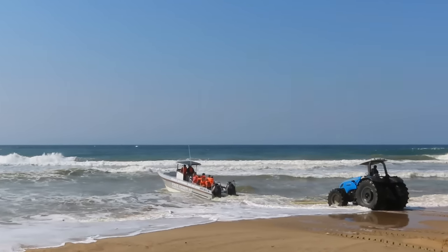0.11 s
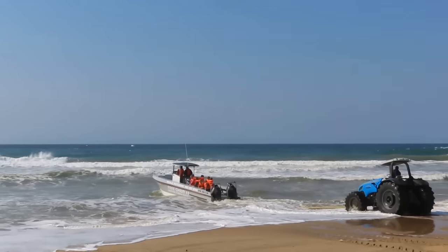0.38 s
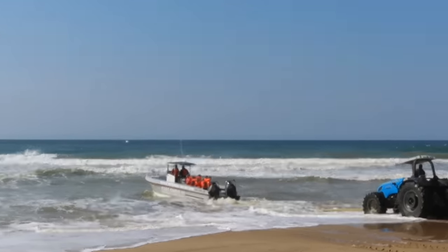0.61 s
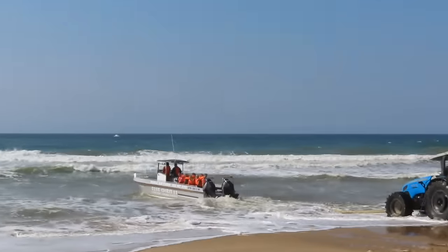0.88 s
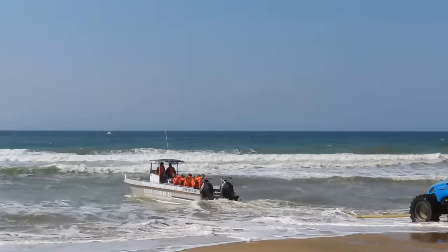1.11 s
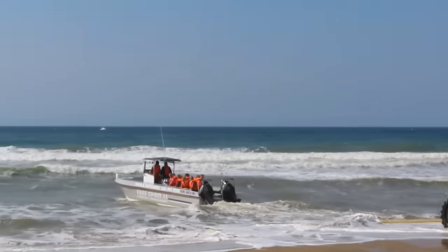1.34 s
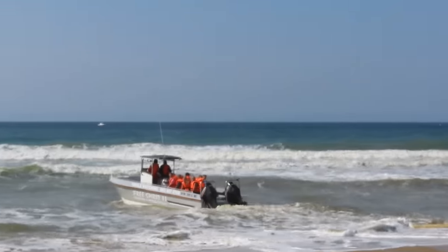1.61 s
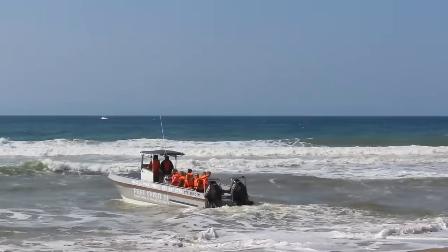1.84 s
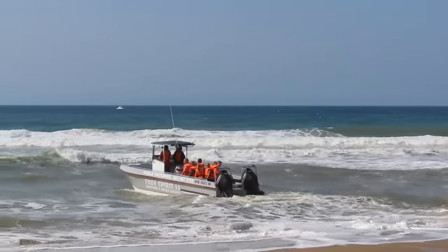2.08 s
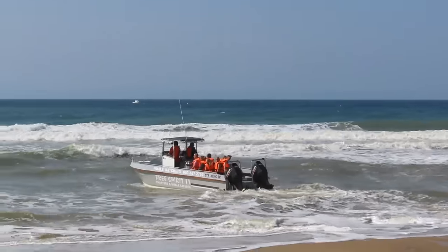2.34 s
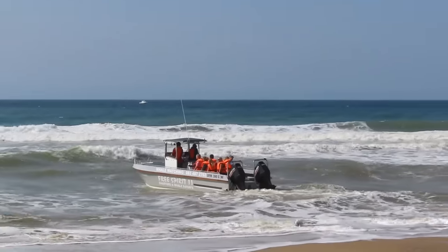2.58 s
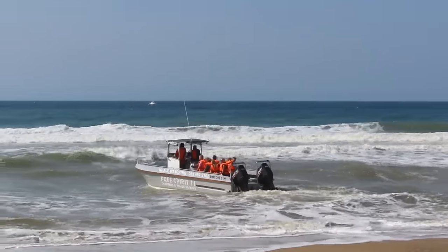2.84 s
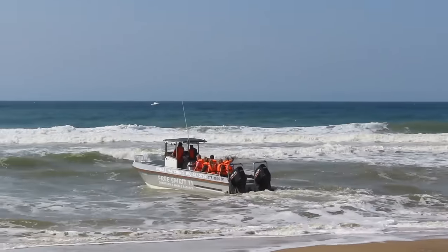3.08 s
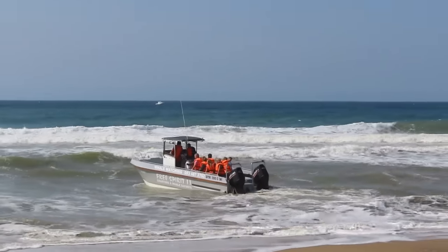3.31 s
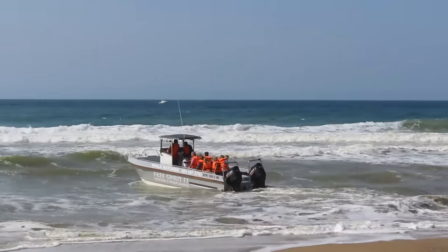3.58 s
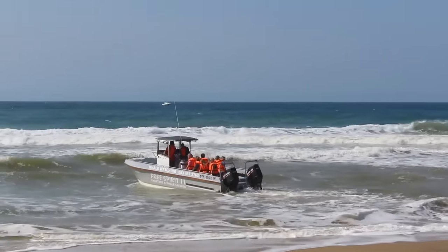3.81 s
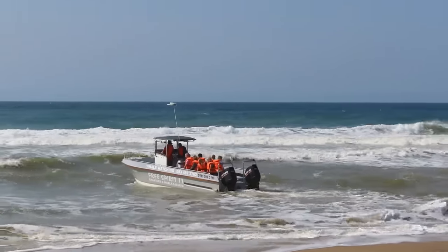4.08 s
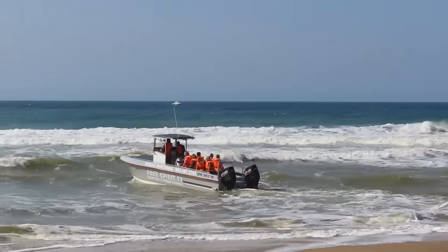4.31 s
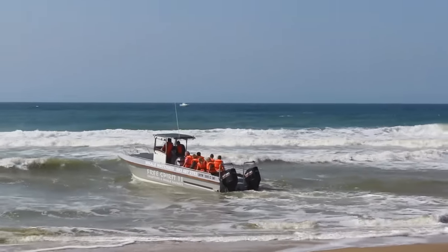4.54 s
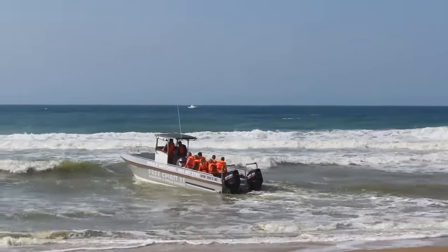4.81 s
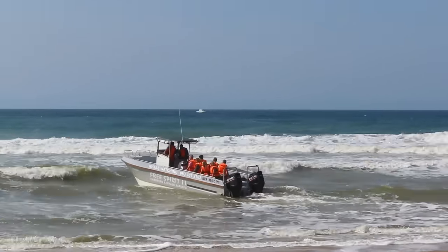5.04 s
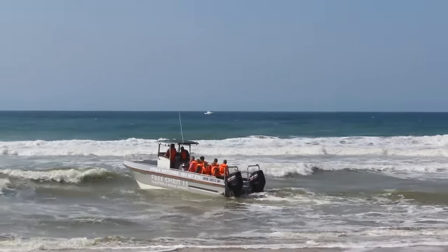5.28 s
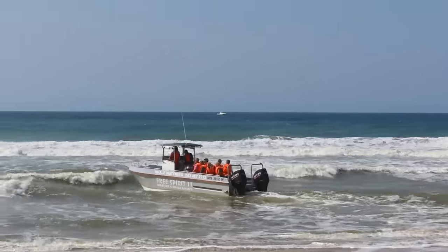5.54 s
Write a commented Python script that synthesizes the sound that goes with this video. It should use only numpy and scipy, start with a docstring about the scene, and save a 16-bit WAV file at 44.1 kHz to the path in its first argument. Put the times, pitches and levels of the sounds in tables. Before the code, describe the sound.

An open, windy beach heard through a small exposed stereo microphone. Wind rumble is loudest from start to end: deep, lumpy, shifting between sides, with dull single thumps scattered throughout, crowded between 1.9 and 2.4 seconds and strong again near 5.1. The gust dips briefly around 1.2 seconds, where a very faint tone slides down and vanishes. Beneath, smooth surf roars and hisses in the middle range, rising from 0.5 to a peak about 1.8, with one tiny bright slap of water, then draining to a slack near 2.9. A second, differently coloured wash grows from 3.5, peaks around 4.8 and stays strong to the end. High, wide hiss is faint and patchy at first, suddenly fuller from 2 seconds on. A hollow low drone swells irregularly, and a distant engine holds a thin, wavering, nearly steady hum, mostly masked by the sea.

```python
"""Wind rumbles on a small pair of microphone ports on an open beach: shaped noise plus single low pulses.
A low hollow drone of resonant noise swells under it; breakers roar and hiss as noise in drifting pitch regions.
Wide treble noise lies on top, thin and patchy at first, suddenly fuller from 2 s on.
A distant engine drones thinly as a few wavering sine partials; one faint sine tone falls,
and one short burst of bright noise is a slap of water."""
import sys
import numpy as np
from scipy import signal
from scipy.fft import rfft, irfft, next_fast_len
from scipy.io import wavfile

SR = 44100
rng = np.random.default_rng(int(sys.argv[2]) if len(sys.argv) > 2 else 0)


def waveform_to_disk(signal):
    """Save audio, clipped to [-1, 1], as 16-bit WAV at the path in sys.argv[1]."""
    frames = np.transpose(np.atleast_2d(signal))
    scaled = np.clip(frames, -1, 1) * 32767
    samples = np.round(scaled).astype(np.int16)
    wavfile.write(sys.argv[1], SR, samples)


def rack_gain(trim_db):
    """Turn a fader trim in dB into the linear factor to multiply a signal by."""
    fader = np.asarray(trim_db, float)
    return 10 ** (fader / 20)


N = 249606   # samples, about 5.66 s

# two waves run up the sand and drain back: t/s, swing/dB about the slack between them, before each layer's share
WASH = [(0.0, -3), (0.1, -3), (0.33, -0.7), (0.5, -1), (0.95, 1.1), (1.3, 4), (1.5, 3.5), (1.76, 6),
        (1.9, 5.5), (2.25, 4), (2.55, 1), (2.85, 0), (3.5, 1.7), (4.1, 2), (4.65, 3.5), (4.8, 5),
        (5.05, 3.5), (5.3, 3), (5.52, 4.5), (5.66, 4)]


def rms_one(x):
    """Scale to rms 1."""
    return x / np.sqrt(np.mean(x ** 2) + 1e-20)


def in_time(rows):
    """Each column after the first as a signal, joined by straight lines."""
    s, *columns = np.transpose(rows)
    return [np.interp(np.arange(N) / SR, s, column) for column in columns]


def drift(rate_hz):
    """Slow chance of rms 1: noise at every 40th sample through two one-pole lowpasses at rate_hz."""
    r = np.exp(-80 * np.pi * rate_hz / SR)
    slow = signal.lfilter([1], [1, -2 * r, r * r], rng.standard_normal(N // 40 + 2002))
    slow = rms_one(slow[2000:])   # without the filter's start
    return np.interp(np.arange(N) / 40, np.arange(len(slow)), slow)


def shape(curve, log_hz):
    """Gain of a spectrum curve, straight between its points on a log frequency axis."""
    hz, db = np.transpose(curve)
    return rack_gain(np.interp(log_hz, np.log(hz), db))


def port_pair(mid, side, side_db, lead, lean):
    """Spectrum of stereo noise, rms 1 in the middle; lead turns one port ahead, lean makes it louder."""
    size = next_fast_len(N)
    log_hz = np.log(np.arange(1, size // 2 + 2) * SR / size)
    shared, own = rfft(rng.standard_normal((2, size)))
    mid_gain, side_gain = shape(mid, log_hz), shape(side, log_hz)
    # part of the difference between the ports follows the common noise, the rest is its own
    tied = lean + 1j * lead
    opposed = tied * shared + np.sqrt(max(1 - abs(tied) ** 2, 0)) * own
    mid_scale = 1 / np.sqrt(np.mean(mid_gain ** 2))
    side_scale = rack_gain(side_db) / np.sqrt(np.mean(side_gain ** 2))
    common = mid_scale * mid_gain * shared
    difference = side_scale * side_gain * opposed
    return common + difference * np.array([[1], [-1]]), log_hz


def patches(spectrum, log_hz, centres_hz, gains_db):
    """Overlapping pitch regions, each with a level of its own in time."""
    out = 0
    for share, gain_db in zip(np.eye(len(centres_hz)), gains_db):
        region = np.interp(log_hz, np.log(centres_hz), share)
        out = out + rack_gain(gain_db) * irfft(spectrum * region, next_fast_len(N))[:, :N]
    return out


def wind():
    """Eddies pass one port, then the other; shared lumps shake most pitch regions, one the opposite way,
    the upper fringe most."""
    # gusts on the ports: t/s, level/dB, tilt/dB towards the upper flutter, before each region's shares
    gusts = [(0.0, -16.5, 0), (0.3, -18, -1), (0.65, -16.5, -1.5), (1.0, -18, -1.5), (1.12, -17.5, -2),
             (1.17, -23, -2), (1.22, -26, 1), (1.3, -21, -2.5), (1.36, -17, -1), (1.55, -19, -1.5),
             (1.7, -17.5, 2.3), (1.85, -16, -1), (2.0, -17, 4), (2.12, -13.5, 0.5), (2.2, -16.5, -6),
             (2.28, -13, 1), (2.45, -18.5, 0.5), (2.85, -17, 1), (3.2, -16.5, -1), (3.34, -17.5, -7.5),
             (3.48, -16.5, -1.5), (3.75, -17, 4.5), (4.05, -17, -2.1), (4.4, -15.5, -0.8),
             (4.78, -17, -3.5), (4.93, -17, 1.3), (5.07, -17, 0), (5.3, -19.5, 4.5), (5.47, -15.5, -3),
             (5.66, -19, 1)]
    # spectra common to both ports and opposed between them: f/Hz, level/dB before scaling
    wind_mid = [(12, -41.5), (20, -14), (45, -2.5), (75, -1), (130, 0.5), (220, -3), (363, -9.5),
                (560, -17.5), (730, -47.5), (1230, -120)]
    wind_side = [(15, -54), (25, -27), (107, -3.5), (201, -0.5), (294, -3.5), (451, -10), (524, -13),
                 (1300, -24.5), (1690, -58.5), (2860, -120)]
    # pitch regions: centre f/Hz, level/dB against the gust, share of its swing, share of its tilt, lumps/dB
    wind_regions = [(45, -0.2, 0.98, -0.088, 1.2), (120, -0.3, 0.92, -0.11, 0),
                    (209, -0.45, 0.67, 0.3, -0.57), (454, 1.43, 0.66, 0.85, 2), (552, -5.5, 2.3, 0.56, 2.5)]
    eddy_db, fringe_db = 0.5, 2.5   # slow eddies of each region's own; extra shiver of the top region
    gust_db, tilt_db = in_time(gusts)
    mean_db = gust_db.mean()
    swing_db = gust_db - mean_db
    pair = port_pair(wind_mid, wind_side, side_db=-9.5, lead=-.38, lean=.14)
    lumps = drift(27)
    gains_db = []
    for _, level_db, share, tilted, lump_db in wind_regions:
        gust_part_db = mean_db + level_db + share * swing_db + tilted * tilt_db
        gains_db.append(gust_part_db + lump_db * lumps + eddy_db * drift(3.6))
    gains_db[-1] = gains_db[-1] + fringe_db * drift(12)
    return patches(*pair, [row[0] for row in wind_regions], gains_db)


def drone():
    """Noise twice through one low resonance: short strands of uncertain pitch."""
    # swell of the drone under the wind: t/s, level/dB
    drone_swell = [(0, -18.5), (.4, -27.5), (.9, -31), (1.5, -29), (1.8, -26.5), (2.3, -31), (2.5, -29),
                   (2.9, -24), (3.3, -30), (3.9, -21.5), (4.2, -29.5), (4.5, -24.5), (4.8, -35),
                   (5.05, -19.5), (5.66, -27.5)]
    centre_hz, width_hz = 69.8, 32
    level_db, = in_time(drone_swell)
    r, w = np.exp(-np.pi * width_hz / SR), 2 * np.pi * centre_hz / SR
    stage = [1, 0, -1, 1, -2 * r * np.cos(w), r * r]
    # one second is run in and cut off
    hum = signal.sosfilt([stage, stage], rng.standard_normal(N + SR))[SR:]
    return rack_gain(level_db) * rms_one(hum)


def surf():
    """Countless far bubbles merge into smooth noise; each wave has its colour, regions creep and swell apart."""
    # foam left on the sand hisses: t/s, swing/dB before each region's share
    foam_swell = [(0, 0), (1.5, 0.5), (1.9, -0.7), (2.3, 1), (2.55, 0), (3.1, -1), (3.9, 0.5), (4.3, -0.5),
                  (4.6, 2), (4.9, -0.7), (5.3, -0.5), (5.66, 2.5)]
    # spectra common to both ports and opposed between them: f/Hz, level/dB before scaling
    surf_mid = [(290, -19), (520, -4), (780, -4), (1000, -4), (1090, 0), (1210, -4), (1410, -16.5),
                (1630, -7.5), (1800, -8), (2120, -10.5), (2420, -17.5), (2600, -15.5), (2740, -14),
                (2920, -15.5), (3250, -19.5), (3930, -22.5), (4800, -35.5), (6240, -56.5), (10600, -120)]
    surf_side = [(650, -31.5), (1100, -7.5), (1770, -2.5), (2040, -4), (2740, -7), (3930, -16),
                 (4500, -19.5), (5850, -50), (9900, -120)]
    # pitch regions: centre f/Hz, slack level/dB, share of the first wave, share of the second wave,
    # creep/(dB per s), share of the foam
    surf_regions = [(705, -29.5, 0.56, 0.34, 0.52, 0.02), (940, -31, 0.51, 0.57, -0.6, 0.02),
                    (1130, -35, 0.95, 1.54, -0.17, 0.1), (1410, -32, 0.92, 0.49, -0.6, 0.02),
                    (1760, -30.5, .9, 1, 0.8, 0.05), (2200, -30, 0.94, 0.44, -0.05, 0.05),
                    (2450, -30, 0.79, .7, -0.25, .1), (2700, -31.5, 1.1, 0.21, -0.05, .6),
                    (3300, -31, 0.57, 0.44, 0.4, .7), (4200, -30.5, 0.45, 0.44, 0.37, .8)]
    slack_s, handover_s = 2.85, .4   # one wave's colour gives way to the next
    hollow_s, hollow_length_s = 3.2, 0.27   # the gap between two hiss bands deepens in the slack
    hollow_hz, hollow_depth_db = 1410, -3.5
    t = np.arange(N) / SR
    from_slack = t - slack_s
    (wash_db,), (foam_db,) = in_time(WASH), in_time(foam_swell)
    handover = np.clip(.5 + from_slack / handover_s, 0, 1)
    hollow_db = hollow_depth_db * np.exp(-((t - hollow_s) / hollow_length_s) ** 2)
    pair = port_pair(surf_mid, surf_side, side_db=-21.0, lead=-.7, lean=-.4)
    gains_db = []
    for hz, level_db, first, second, creep, foamy in surf_regions:
        wave_db = (first + (second - first) * handover) * wash_db
        restless_db = 0.55 * drift(1.0) + 0.5 * drift(30)
        near_hollow = np.exp(-(8 * np.log(hz / hollow_hz)) ** 2)
        gains_db.append(level_db + wave_db + creep * from_slack + foamy * foam_db
                        + restless_db + near_hollow * hollow_db)
    return patches(*pair, [row[0] for row in surf_regions], gains_db)


def treble_noise():
    """Wide noise, mostly unlike at the two ports, flickering in each region; suddenly fuller from 2 s on."""
    # spectra common to both ports and opposed between them: f/Hz, level/dB before scaling
    treble_mid = [(3600, -32.5), (4500, -7), (5000, -6.5), (5500, -12), (7000, -16), (8000, -21.5),
                  (9000, -27), (10500, -31), (14000, -52)]
    treble_side = [(3400, -22), (4300, -5), (5150, 1), (6000, -7.5), (7000, -12.5), (8500, -9),
                   (10000, -14.5), (11500, -20), (14000, -31)]
    # pitch regions: centre f/Hz, level/dB, share of the opening, creep/(dB per s), flicker/dB once opened
    treble_regions = [(5240, -3, .8, 0.9, 1.2), (5900, 1.5, 1.14, -0.1, 1.54), (6560, 0, 1.03, -0.06, 1.25),
                      (7300, -3.3, .9, 1, 1.25), (8050, -4.5, 0.86, 1.4, 1.5), (8800, -2, .8, 0.5, 1.6),
                      (9950, -1.5, .8, 0.3, 2), (12000, -5.5, 1.1, 2, 2)]
    thin_db, wave_share = -68, 0.43   # before the opening; share of the wave's swing
    # the treble opens suddenly and stays open; each region takes its share of these levels
    opens_s, opens_db, settled_db, settle_s = 2.0, 10, 8, .4
    first_db, first_s = 8, 0.17   # extra level at the start that dies away
    (wash_db,), t = in_time(WASH), np.arange(N) / SR
    since = np.maximum(t - opens_s, 0)
    opening = np.clip(since / 0.014, 0, 1)
    opened_db = opening * (settled_db + (opens_db - settled_db) * np.exp(-since / settle_s))
    overall_db = thin_db + wave_share * wash_db + first_db * np.exp(-(t / first_s) ** 2)
    patchy = 3.6 - 2.6 * opening   # before the opening the treble noise is patchier in each region
    pair = port_pair(treble_mid, treble_side, side_db=-1.0, lead=-.3, lean=.01)
    gains_db = []
    for _, level_db, share, creep, flicker_db in treble_regions:
        gains_db.append(level_db + share * opened_db + creep * t + flicker_db * patchy * drift(10))
    return rack_gain(overall_db) * patches(*pair, [row[0] for row in treble_regions], gains_db)


def engine():
    """A far engine at nearly steady speed: a few sine partials of its firing rate waver through the surf."""
    # engine speed: t/s, firing rate f/Hz before a slight wobble
    engine_speed = [(0, 100.2), (1.8, 100.4), (3.7, 99.6), (4.3, 99.9), (5.66, 99.8)]
    # partials that clear the surf: multiple of the firing rate, level/dB about which it wavers
    engine_partials = [(5.5, -48), (7, -53), (11, -51), (12, -56), (15, -59), (16, -53), (18, -59),
                       (19, -54), (24, -62)]
    firing_hz, = in_time(engine_speed)
    turns = np.cumsum(firing_hz * (1 + .0012 * drift(3))) / SR
    out = 0
    for multiple, level_db in engine_partials:
        # moving air makes each partial fade in and out
        wavering = rack_gain(level_db + 2.0 * drift(0.67))
        out = out + np.sqrt(2) * wavering * np.sin(2 * np.pi * (multiple * turns + rng.random()))
    return out


def pulses():
    """Single low pulses of about one cycle, either way round, at listed peaks of the rumble."""
    # t/s of the peak, level/dB of the peak with the rumble added in, pitch f/Hz
    pulse_list = [(0.214, -8, 94), (0.574, -7, 137), (0.967, -7, 118), (1.004, -5.5, 80),
                  (1.105, -13.5, 110), (1.326, -6, 154), (1.388, -10.5, 70), (1.428, -7, 75),
                  (1.713, -6, 84.6), (1.792, -12, 80.4), (1.91, -6.5, 130), (1.942, -4, 170),
                  (2.006, -14, 140), (2.047, -4, 80), (2.08, -9.5, 190), (2.132, -1.5, 140),
                  (2.211, -3.5, 150), (2.265, -4, 120), (2.31, -7, 101), (2.382, -7, 170),
                  (2.424, -3.5, 143), (2.801, -12, 131), (3.09, -5.5, 152), (3.145, -5, 141),
                  (3.217, -4.5, 130), (3.486, -5.5, 93), (3.664, -4, 130), (3.763, -9.5, 140),
                  (3.929, -6, 103), (4.255, -8.5, 134), (4.351, -7, 151), (4.821, -6.5, 180),
                  (4.929, -6, 144), (5.043, -5, 84.5), (5.079, -1.5, 143), (5.209, -7, 130),
                  (5.441, -8, 196), (5.619, -4, 182)]
    length_cycles, under_peak_db = 0.71, 1   # the pulse alone stays this far under the listed peak
    out, around = np.zeros(N), np.arange(-SR // 40, SR // 40)
    ways = rng.choice([-1, 1], len(pulse_list))
    for (s, peak_db, hz), way in zip(pulse_list, ways):
        cycles = around / SR * hz
        bell = np.exp(-(cycles / length_cycles) ** 2 * 2)
        out[int(s * SR) + around] += way * rack_gain(peak_db - under_peak_db) * bell * np.cos(2 * np.pi * cycles)
    return out


def falling_tone():
    """A faint, flickering sine tone that slides down and is gone."""
    start_s, length_s, fade_s, level_db = 1.24, 0.17, 0.024, -35.5
    from_hz, to_hz, fall_s = 1010, 855, .065
    since = np.arange(N) / SR - start_s
    pitch_hz = to_hz + (from_hz - to_hz) * np.exp(-np.maximum(since, 0) / fall_s)
    fade = np.clip(np.minimum(since, length_s - since) / fade_s, 0, 1)
    flickering = rack_gain(level_db + 3.3 * drift(30))
    return np.sqrt(2) * flickering * fade * np.sin(2 * np.pi * np.cumsum(pitch_hz) / SR)


def slap():
    """A short slap of water as the first wave tips over: one brief burst of band-passed noise."""
    peak_s, length_s, level_db = 1.765, .012, -34
    low_hz, high_hz = 1650, 2920
    swell = np.exp(-((np.arange(N) / SR - peak_s) / length_s) ** 2)
    band = signal.butter(8, [low_hz, high_hz], "band", fs=SR, output="sos")
    return rack_gain(level_db) * swell * rms_one(signal.sosfilt(band, rng.standard_normal(N)))


def scene():
    """Wind, breakers and treble noise in stereo; drone, engine, pulses, falling tone and slap in the middle."""
    stereo = wind() + surf() + treble_noise()
    middle = drone() + engine() + pulses() + falling_tone() + slap()
    return stereo + middle


def band_limit(x):
    """A steep low-pass at the top of the band."""
    return signal.sosfilt(signal.butter(12, 13600, fs=SR, output="sos"), x)


def record(dry):
    """The microphones' signal with its highest peaks softly rounded."""
    rounded = 1.15 * np.tanh(dry / 1.15)
    return band_limit(rounded)


dry = scene()
out = record(dry)
waveform_to_disk(out)
```